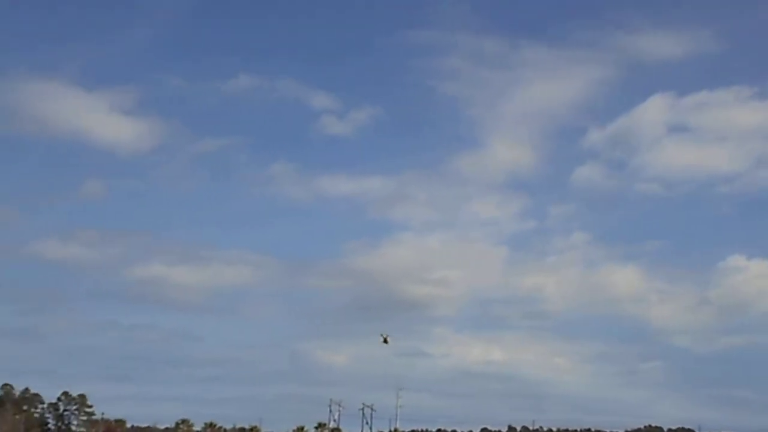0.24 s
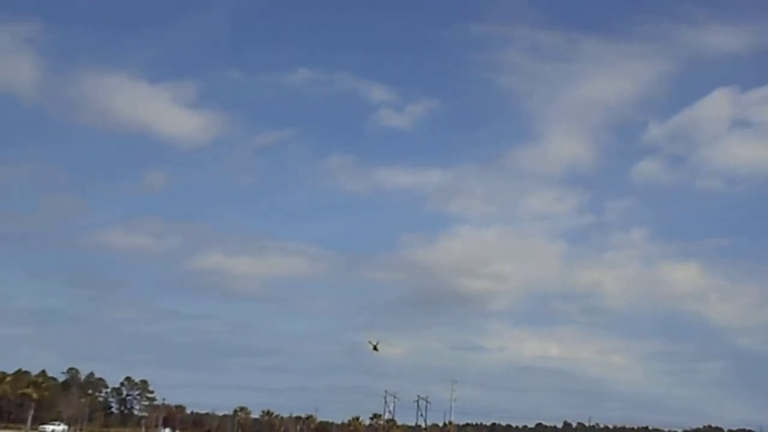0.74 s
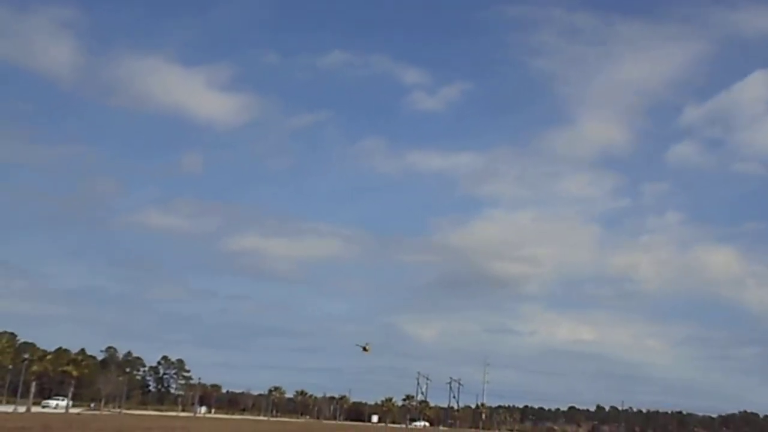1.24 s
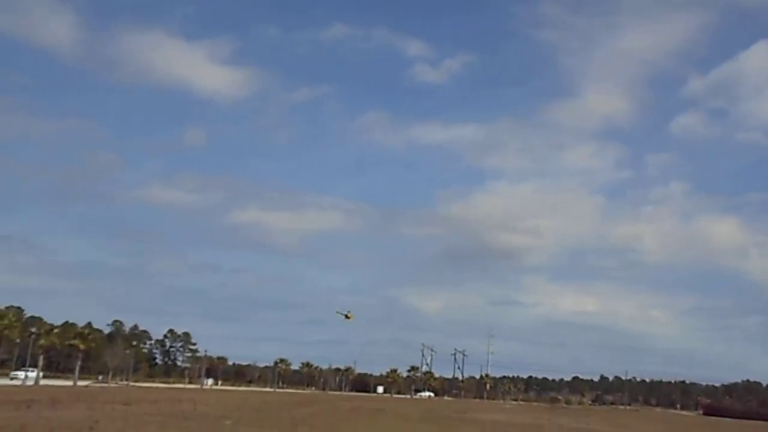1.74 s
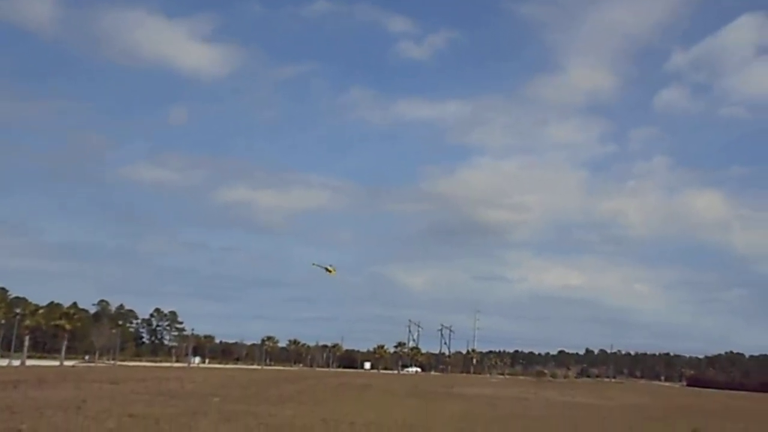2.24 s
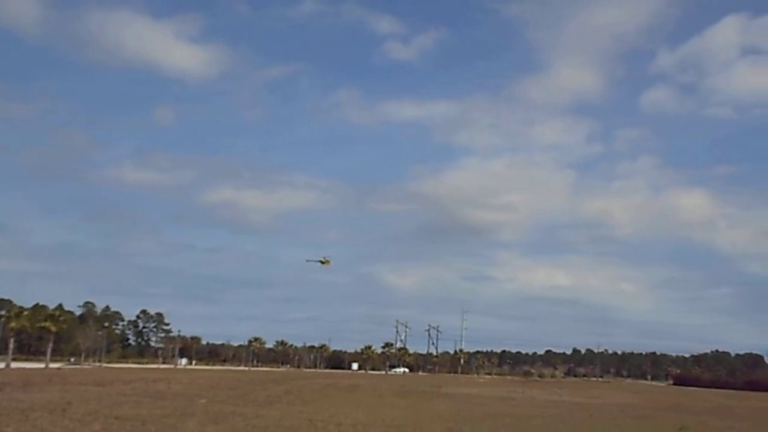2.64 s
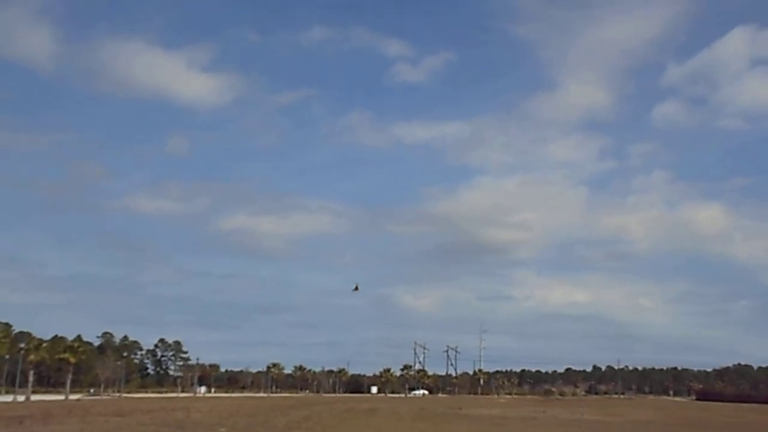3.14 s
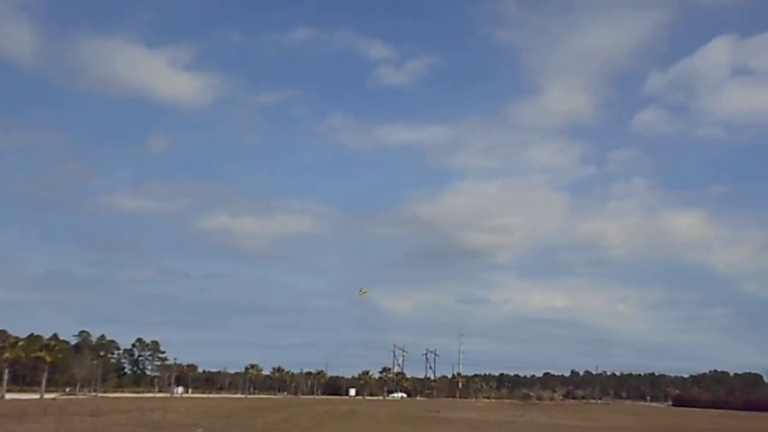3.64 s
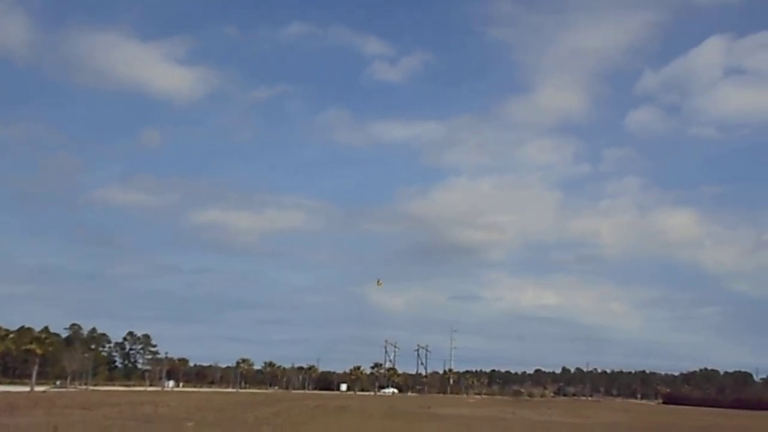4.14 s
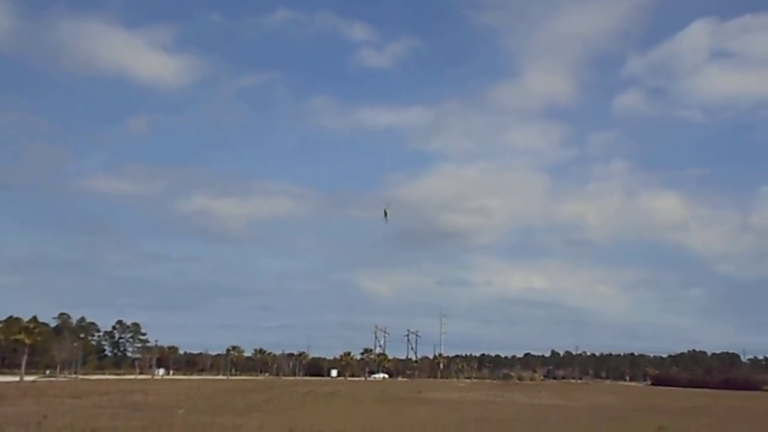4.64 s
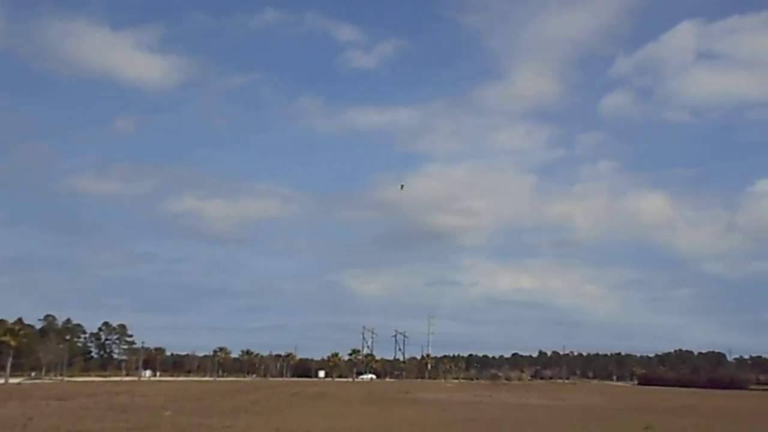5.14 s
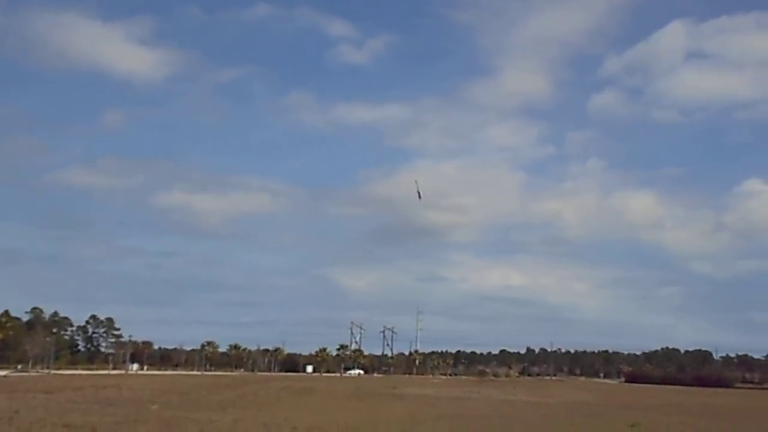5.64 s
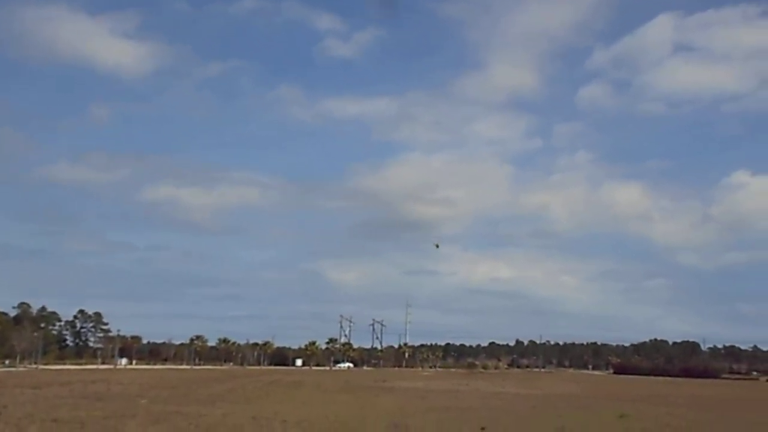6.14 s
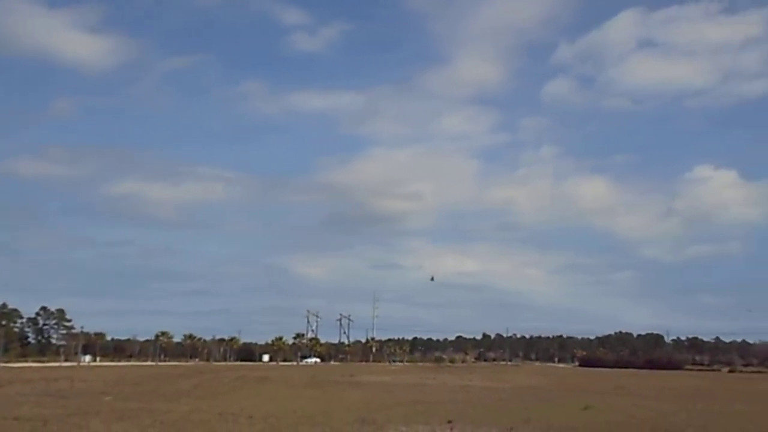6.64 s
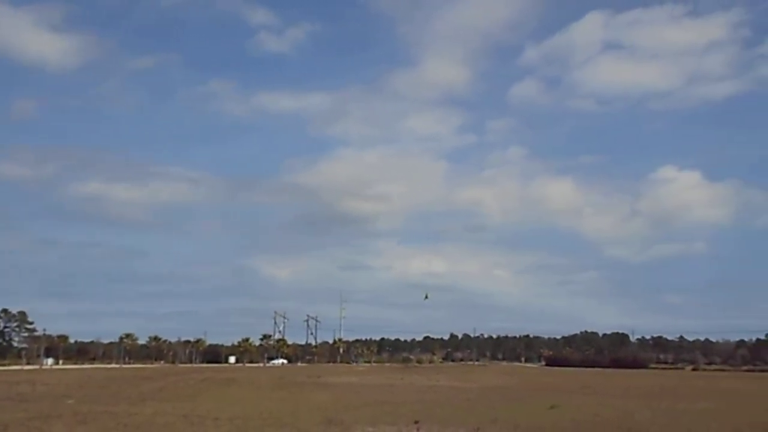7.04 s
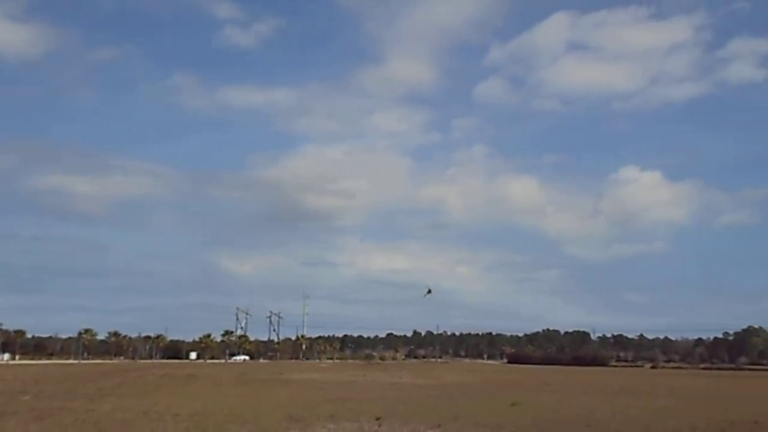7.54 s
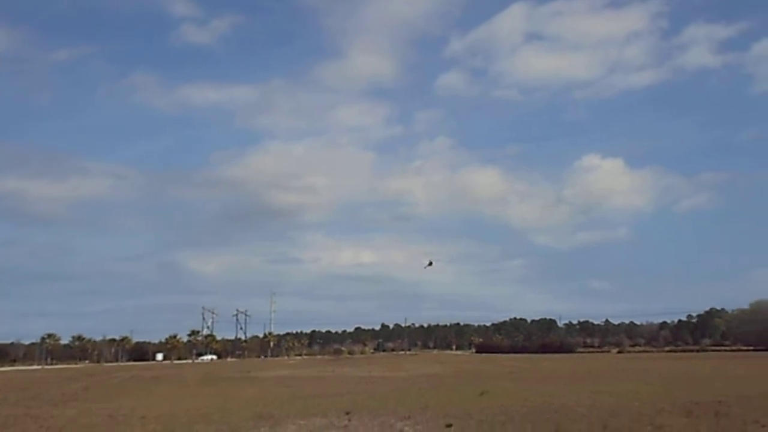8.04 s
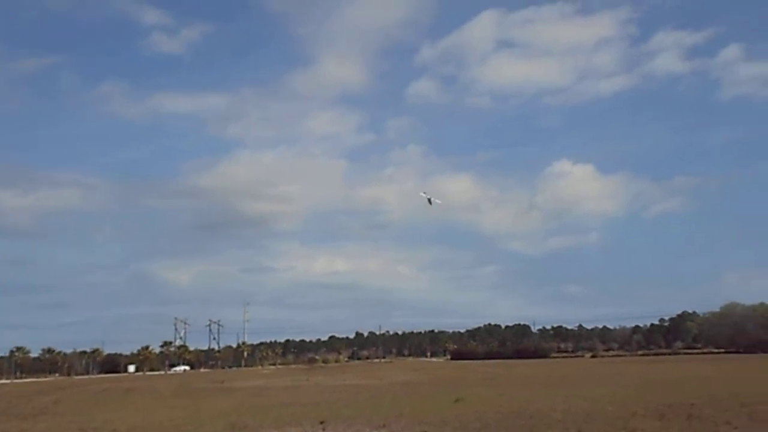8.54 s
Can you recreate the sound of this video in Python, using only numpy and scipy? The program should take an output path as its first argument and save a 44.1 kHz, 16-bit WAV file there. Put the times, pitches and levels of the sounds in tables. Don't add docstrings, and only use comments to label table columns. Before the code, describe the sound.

Outdoors in a wide field, wind thuds on an unprotected handheld microphone. Beyond it, a distant electric model helicopter gives a piercing, wavering gear whine, softer tail rotor tones and a steady hiss. It first quietens, then bursts back with hissing effort, dips in pitch, chops hard twice, recovers, and later chops more softly. A faint dull ground echo colours the blades.

```python
import sys
import numpy as np
from scipy import signal
from scipy.fft import rfft, irfft, next_fast_len
from scipy.io import wavfile
from scipy.ndimage import uniform_filter1d

SR = 44100
rng = np.random.default_rng(int(sys.argv[2]) if len(sys.argv) > 2 else 0)


def decibels_to_gain(level_db):
    exponent = np.asarray(level_db, float) / 20
    return 10 ** exponent


def store_wav(level_fs):
    pcm = np.round(np.clip(np.atleast_2d(level_fs), -1, 1) * 32767)
    wavfile.write(sys.argv[1], SR, pcm.T.astype(np.int16))


N = 388521
CONTROL_STEP = 40
ROTOR = 13 / 150
TAIL = ROTOR * 106 / 25
POLES = 8 * ROTOR


def in_time(rows):
    s, *columns = np.transpose(rows)
    return [np.interp(np.arange(N) / SR, s, column) for column in columns]


def bumps(rows):
    t = np.arange(0, N + CONTROL_STEP, CONTROL_STEP) / SR
    total = sum(height * np.exp(-np.abs(2 * (t - s) / length) ** 2.3) for s, length, height in rows)
    return np.interp(np.arange(N) / SR, t, total)


def rms_one(x):
    return x / np.sqrt(np.mean(x ** 2) + 1e-20)


def drift(rate):
    r = np.exp(-2 * np.pi * CONTROL_STEP * rate / SR)
    sparse = rng.standard_normal(N // CONTROL_STEP + 2002)
    slow = signal.lfilter([1], [1, -2 * r, r * r], sparse)[2000:]
    return np.interp(np.arange(N) / CONTROL_STEP, np.arange(len(slow)), rms_one(slow))


def bands(spectrum, edges):
    size = next_fast_len(N)
    log_hz = np.log(np.arange(1, size // 2 + 2) * SR / size)
    at_hz, db = np.transpose(spectrum)
    noise = rfft(rng.standard_normal(size)) * decibels_to_gain(np.interp(log_hz, np.log(at_hz), db))
    for low, high in zip(edges, edges[1:]):
        rise, fall = (np.clip((log_hz - np.log(edge)) / .06 + .5, 0, 1) for edge in (low, high))
        yield np.sqrt(low * high), irfft(noise * np.sqrt(rise - fall), size)[:N]


# (time [s], speed [turns/s])
SHAFT_SPEED = [(0, 621), (.4, 618), (1.15, 617.5), (2.12, 600.7), (3.12, 607.3), (4.25, 613.5), (4.49, 590),
               (4.65, 583), (4.85, 559.5), (5.0, 555.5), (5.3, 587.5), (6.13, 598), (6.38, 615),
               (6.72, 621), (7.7, 604.8), (7.97, 607.5), (8.37, 573.5), (8.81, 579)]


def shaft():
    inertia_s = .1
    speed = uniform_filter1d(in_time(SHAFT_SPEED)[0], size=round(inertia_s * SR))
    return np.cumsum(speed) / SR


# (order [per motor turn], level under group [dB])
PARTIALS = [
    [(13, 0), (12, -19), (13 - 2 * ROTOR, -16), (13 + 2 * ROTOR, -20), (7, -17)],
    [(13 - POLES, 0), (13 - 6 * ROTOR, -8)],
    [(13 + POLES, 0), (12, -12)],
    [(14, 0), (14 + TAIL, -6), (14 + POLES, -10), (14 + ROTOR, -11), (15 + TAIL, -12)],
    [(8, 0), (13 + TAIL, -7)],
    [(4 * TAIL, -2), (6 * TAIL, -6), (1, -9)],
    [(5 * TAIL, 0), (3 * TAIL, 0)],
    [(8 * TAIL, 0), (10 * TAIL, 0), (9 * TAIL, -7)],
    [(12 * TAIL, 0), (14 * TAIL, -4), (13 * TAIL, -7), (15 * TAIL, -7), (16 * TAIL, -7)],
    [(9, 0), (25 * TAIL, -1)],
    [(15, 0), (16, 0)],
    [(4, 0), (5, -4), (10, -5)],
    [(13 - 6 * ROTOR, 0), (13 + TAIL, -1), (13 - 2 * ROTOR, -3)],
]
# (time [s], level [dB])
GEARBOX = [(0, -39), (.49, -32), (.7, -37), (1.19, -41), (1.37, -48), (1.95, -47), (2.5, -52), (3.3, -52),
           (3.69, -67), (4.06, -62), (4.4, -47), (5.18, -49), (5.54, -42), (6.13, -55), (7.07, -39),
           (7.88, -44), (8.34, -54), (8.81, -42)]
# (time [s], length [s], peak [dB])
MOTOR_GLINTS = [
    [(.45, .9, -42.5), (1.4, 1.0, -55), (2.45, .4, -50), (3.1, 1, -56), (4.4, 0.28, -65), (5.0, 0.37, -54),
     (5.7, 0.73, -50), (6.1, .25, -50), (7.0, 0.91, -44.5), (8.8, 0.42, -48)],
    [(.6, 1.2, -66), (2.35, 0.26, -61), (3.55, 1.9, -66), (4.7, 0.37, -44.5), (5.7, 2.7, -51),
     (7.25, 0.62, -44), (8.55, 2.1, -51)],
    [(.49, 0.5, -58), (3.25, 0.37, -48.5), (3.9, 0.86, -71), (7.1, 0.34, -41.5)],
    [(2.1, 0.57, -54), (2.75, 1.5, -55), (4.5, 0.49, -57), (4.87, 0.14, -52), (5.46, 0.43, -48),
     (6.2, 0.51, -49), (7.3, 1.9, -51), (7.38, 0.17, -48), (8.5, .7, -62)],
]
# (time [s], length [s], peak [dB])
TAIL_GLINTS = [
    [(.95, 1, -46.5), (1.85, 0.74, -64.5), (2.75, 3.3, -54), (4.65, 0.4, -44), (5.7, 0.26, -49),
     (6.8, 1.77, -41.5), (7.8, 0.32, -62.5), (8.65, 0.45, -47)],
    [(.3, 0.21, -51), (1.19, .25, -68), (2.0, 0.31, -53), (4.55, 1.5, -57), (6.0, 0.17, -63),
     (7.2, 1.03, -54), (8.45, .9, -48)],
]
# (time [s], length [s], peak [dB])
FRAME_GLINTS = [
    [(2.3, 1.5, -66), (7.9, .6, -63), (8.55, .35, -60)],
    [(2.75, .4, -63), (8.38, .35, -55)],
    [(.5, 1.0, -63), (2.2, 1.8, -60), (3.8, .6, -65), (4.53, .4, -56), (5.3, .35, -57), (6.6, .9, -56),
     (8.0, .5, -62)],
    [(3.2, .8, -62), (4.45, .6, -55), (5.4, .4, -56), (6.4, .4, -57), (7.4, 1.6, -57), (8.3, .5, -56)],
    [(4.0, 1.5, -65), (5.1, .8, -62), (6.7, .8, -60), (8.1, .8, -62)],
    [(3.8, .7, -60), (7.4, 1.0, -53), (8.5, .4, -58)],
]
OFF_BEAM_DB = [-27, -21, -6.5, -29, -25, -22, -24.5, -26.5, -18, -27, -59, -25]


def whine(turns):
    out = np.zeros(N)
    mesh = decibels_to_gain(in_time(GEARBOX)[0])
    levels = [mesh]
    for off_db, glints in zip(OFF_BEAM_DB, MOTOR_GLINTS + TAIL_GLINTS + FRAME_GLINTS):
        beam = bumps([(s, length, decibels_to_gain(peak_db)) for s, length, peak_db in glints])
        levels.append(np.hypot(decibels_to_gain(off_db) * mesh, beam))
    for level, partials in zip(levels, PARTIALS):
        for order, under_db in partials:
            fade_db = 1.5 + (2.6 + .07 * abs(under_db)) * drift(7.0)
            waver = 0.24 * drift(11.0) + 2 * np.pi * rng.random()
            out += level * decibels_to_gain(under_db + fade_db) * np.sin(2 * np.pi * order * turns + waver)
    return np.sqrt(2) * out


# (frequency [Hz], density [dB per Hz])
BLADE_COLOUR = [(150, -7.5), (850, 0.5), (1350, -2), (1600, -7), (2700, -4.5), (3700, -6.5), (4600, -2),
                (5700, -6), (6600, -9), (7600, -4.5), (9000, -3.5), (10300, -6.5), (10900, -21),
                (12000, -24)]
# (multiple of blade rate, level [dB])
BLADE_ORDERS = [(1, 2), (2, -8), (3, -8), (4, -11), (5, -11), (6, -9), (7, -8), (8, -7), (9, -14), (10, -8),
                (12, -14)]


def blades(turns):
    chop, (tone_db, tail_db), zones_db = effort()
    angle = 4 * np.pi * ROTOR * turns + 0.61
    out = np.zeros(N)
    for k, db in BLADE_ORDERS:
        out += decibels_to_gain(tone_db + db + 2.0 * drift(5.0)) * np.sin(k * angle + k * k)
    out += np.sqrt(2) * decibels_to_gain(tail_db + drift(5.0)) * np.sin(4 * np.pi * TAIL * turns)
    air_db = .8 * drift(4.0)
    edges_hz = [150, 1600, 3700, 6700, 12350]
    bites, trims_db = [0.38, 1.03, 0.84, 0.47], [-0.38, 0.15, .1, 0.18]
    strength, grit = drift(60), drift(450)
    for level_db, low, high, bite, trim_db in zip(zones_db, edges_hz, edges_hz[1:], bites, trims_db):
        noise = np.zeros(N)
        depth = bite * chop
        for _, band in bands(BLADE_COLOUR, np.geomspace(low, high, num=5)):
            gate = np.exp(depth * (np.cos(angle + .25 * drift(30)) - 1))
            gate *= decibels_to_gain(depth * (.4 * strength + 1.5 * grit + .7 * drift(60)))
            gate = .25 + gate / np.sqrt(uniform_filter1d(gate ** 2, size=2200))
            noise += decibels_to_gain(.7 * drift(5.0)) * gate * band
        out += decibels_to_gain(level_db + trim_db + air_db) * rms_one(noise)
    return out


# (time [s], loudness [dB], edge-on [dB], brighter when positive)
DISC = [(0, -34.5, -3), (.55, -37.5, 1), (1.55, -47, 2), (2.2, -48, 5.5), (3.05, -53.5, 3),
        (4.24, -44.5, -7.5), (4.45, -30.5, -6), (4.7, -34, -10), (4.9, -43.5, -3), (5.16, -45.5, -2),
        (5.45, -36, -2.5), (5.7, -30.5, -1), (6.5, -32, -9.5), (7.35, -31, -4), (7.56, -44.5, 6.5),
        (8.0, -46.5, -1.5), (8.5, -40.5, -4.5), (8.81, -33.5, -1)]
# (start [s], hold [s], release [s], strength [0-1])
BITES = [
    (4.3, .3, 0.18, 0.02),
    (5.118, 0.04, 0.063, 0.83),
    (5.544, 0.47, 0.16, 0.83),
    (7.012, 0.31, 0.34, 0.43),
    (8.623, .3, .1, 0.35),
]
# (time [s], level [dB])
SWELLS = [(.3, 2.5), (.45, 3), (.97, 4.5), (1.2, 3), (1.46, 1), (1.89, 1), (2.46, 3), (2.83, 2.5),
          (3.63, 2.5), (4.45, -1.5), (4.7, 6), (4.9, 2.5), (5.05, 0.5), (5.65, 1), (6.08, 3), (7.37, 2.5)]
# (level [dB], share of disc loudness, of edge-on, of gearbox, of swell, lift at full bite [dB])
ZONES = [
    (-43, 0.85, .01, .01, 0.76, 1.5),
    (-49, 0.88, 0.65, 0.0089, 0.84, 12.5),
    (-45.5, 0.8, 0.88, 0.033, 1.1, 7.5),
    (-44.5, .55, 0.46, 0.16, 1.43, 3),
]
# (level [dB], share of disc loudness, lift at full bite [dB])
MAIN_TONE, TAIL_TONE = (-54, .6, 16), (-47, .75, -3)


def effort():
    attack_s, swell_s, idle_chop = 0.11, 0.15, 0.2
    bite = np.zeros(N)
    for start, hold, release, strength in BITES:
        full = start + attack_s
        bite += in_time([(start, 0), (full, strength), (full + hold, strength), (full + hold + release, 0)])[0]
    swell_db = bumps([(s, swell_s, db) for s, db in SWELLS])
    disc_db, edge_db = in_time(DISC)
    disc_db, gear_db = disc_db + 42, in_time(GEARBOX)[0] + 47
    tones_db = [db + share * disc_db + lift * bite for db, share, lift in (MAIN_TONE, TAIL_TONE)]
    zones_db = [db + disc * disc_db + edge * edge_db + gear * gear_db + swell * swell_db + lift * bite
                for db, disc, edge, gear, swell, lift in ZONES]
    return idle_chop + 1.1 * bite, tones_db, zones_db


# (time [s], lag [ms])
GROUND = [(0, 1.24), (4.3, 1.14), (4.9, 1.33), (5.5, 1.64), (5.8, 1.5), (6.2, 1.09), (6.8, 1.5),
          (8.81, 1.31)]


def ground(x):
    grass_db, grass_cut_hz = -9, 1080
    late = np.interp(np.arange(N) - in_time(GROUND)[0] * SR / 1000, np.arange(N), x)
    cut = np.exp(-2 * np.pi * grass_cut_hz / SR)
    ahead = signal.lfilter([1 - cut], [1, -cut], late[::-1])[::-1]
    return x + decibels_to_gain(grass_db) * signal.lfilter([1 - cut], [1, -cut], ahead)


# (time [s], strength [dB], sharpness [dB])
BREEZE = [(0, -28.5, -5), (.1, -23.5, -3.5), (1.0, -24, 3), (1.95, -21.5, -4), (2.25, -20.5, -10),
          (3.2, -27, -6), (3.75, -18, -5.5), (4.15, -24, -1), (4.27, -40, -8), (4.45, -35, 3.5),
          (4.65, -15, -5), (5.25, -30, 1), (6.0, -34, -8), (6.33, -34, -3.5), (6.5, -25, -6),
          (7.0, -23.5, -3), (7.45, -22.5, -7), (8.81, -25.5, -2)]
# (time [s], length [s], push [dB], extra sharpness [dB])
GUSTS = [(0.137, 0.091, 1.5, 7), (0.458, 0.16, -0.5, 6), (0.778, 0.029, -1.5, 7), (0.985, 0.17, 2.5, 1.5),
         (1.191, 0.087, 2, 3), (1.296, 0.091, 2, 3.5), (1.46, 0.2, 3.5, 0.5), (1.89, 0.22, 1, 5),
         (2.466, 0.38, 4.5, 4.5), (2.976, 0.48, 5, 3), (3.147, 0.064, 5, -1), (3.353, 0.079, 6, 5.5),
         (3.692, 0.11, 2, 4.5), (3.885, 0.11, 2, 2), (4.491, 0.032, 3.5, 3.5), (4.828, 0.19, -2.5, 6),
         (5.015, 0.088, 2, 4), (5.413, 0.089, 8.5, -5), (5.594, 0.061, 12, -0.5), (6.172, .16, 15, 8),
         (6.48, 0.2, 7, 5), (6.912, 0.095, 7, 2), (7.188, 0.075, 4, 9), (7.387, 0.072, 8.5, -2.5),
         (7.5, 0.046, 6, 4.5), (7.87, 0.21, 0.5, 9), (8.287, 0.14, 4, 2.5), (8.69, 0.11, 4, -2)]
# (frequency [Hz], density [dB per Hz])
WIND_COLOUR = [(18, 6), (35, 2), (60, 8), (120, 1), (250, -9), (400, -18), (650, -28.5), (1100, -44.5)]


def wind():
    flutter_db, crackle_db, crackle_share = -1.5, -10, 0.58
    breeze_db, sharp_db = in_time(BREEZE)
    gusts = np.array(GUSTS)
    rumble_db = breeze_db + bumps(gusts[:, [0, 1, 2]])
    sharp_db = sharp_db + bumps(gusts[:, [0, 1, 3]])
    surge, lumps, flicks = drift(16.8), drift(24.0), drift(75)
    zones = np.zeros((3, N))
    for hz, band in bands(WIND_COLOUR, np.geomspace(15, 1300, num=14)):
        octave = np.log2(hz / 30)
        zone = np.searchsorted([125, 360], hz)
        zones[zone] += band * decibels_to_gain(octave * (0.28 * lumps + 1.31 * flicks) + 1.4 * surge)
    power = uniform_filter1d(uniform_filter1d(zones ** 2, size=6000), size=6000)
    steps_db = [rumble_db, flutter_db + sharp_db, crackle_db + crackle_share * sharp_db]
    levels_db = np.cumsum(steps_db, axis=0)
    return np.sum(decibels_to_gain(levels_db) * zones / np.sqrt(power), axis=0)


# (time [s], peak [dB])
POPS = [(1.294, -26), (1.483, -17), (2.771, -16), (3.343, -27), (3.534, -26), (3.564, -24), (3.661, -20),
        (3.679, -17.5), (3.732, -18), (7.784, -20), (8.266, -17)]


def pops():
    clicks = np.zeros(N)
    for s, db in POPS:
        clicks[round(s * SR)] = decibels_to_gain(db)
    t = np.arange(-300, 300) / SR
    snap = -np.cos(2 * np.pi * 680 * t) * np.exp(-(t / 0.0011) ** 2)
    push = 1.9 * np.sin(2 * np.pi * 230 * t) * np.exp(-(t / 0.00087) ** 2)
    return np.convolve(clicks, snap + push, "same")


def scene():
    turns = shaft()
    craft = whine(turns) + ground(blades(turns))
    return (craft + wind() + pops())[None]


def roll_off(x):
    return signal.sosfilt(signal.butter(12, 12370, fs=SR, output="sos"), x)


def record(dry):
    mix = 0.86 * np.tanh(dry / 0.97)
    return roll_off(mix)


dry = scene()
out = record(dry)
store_wav(out)
```